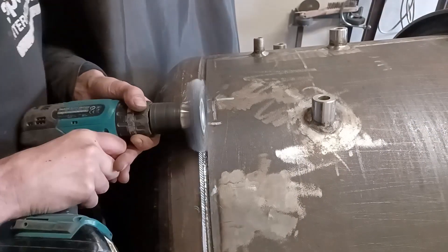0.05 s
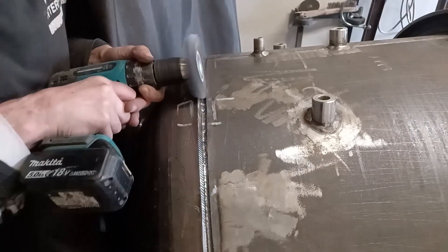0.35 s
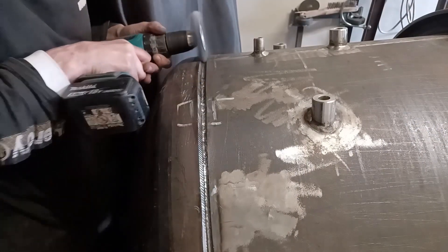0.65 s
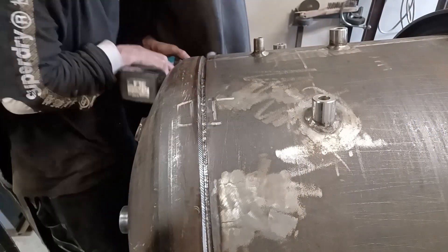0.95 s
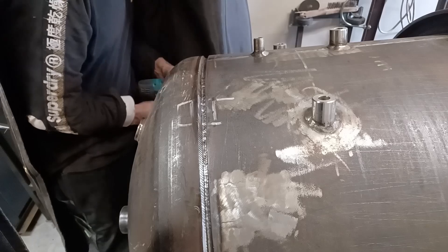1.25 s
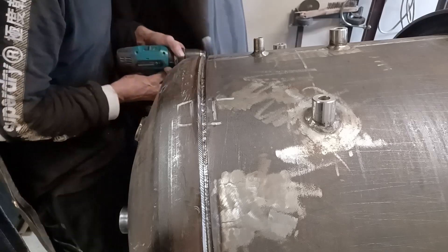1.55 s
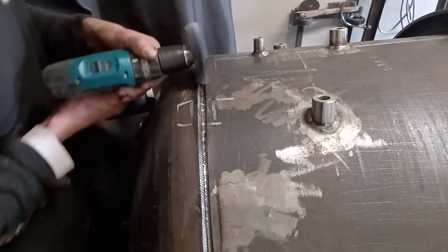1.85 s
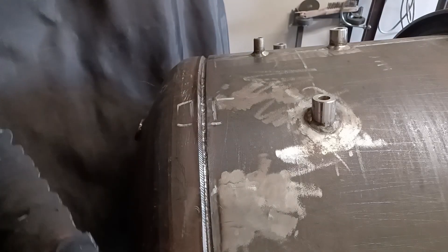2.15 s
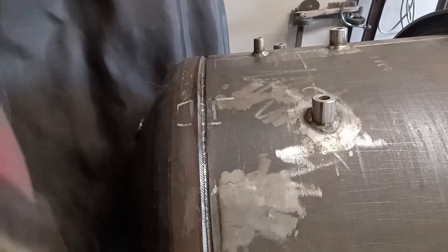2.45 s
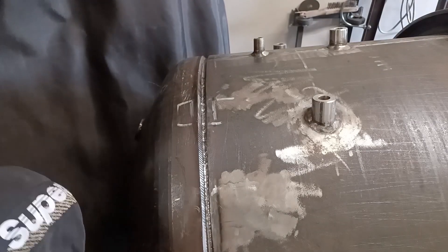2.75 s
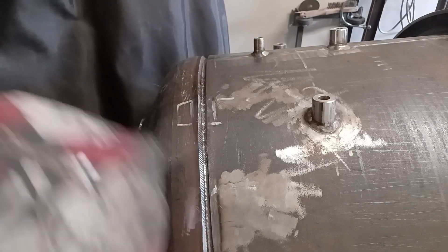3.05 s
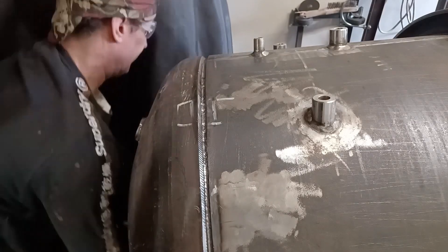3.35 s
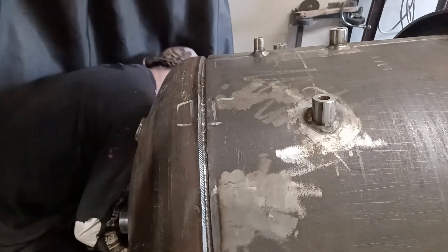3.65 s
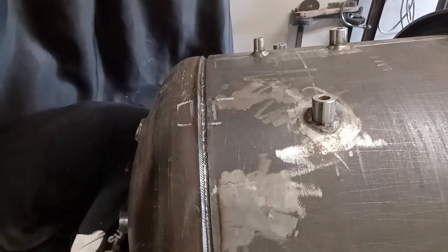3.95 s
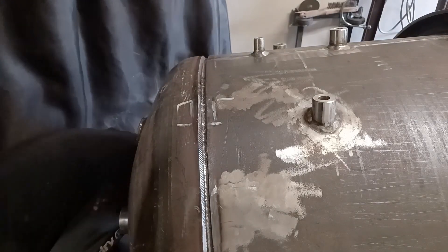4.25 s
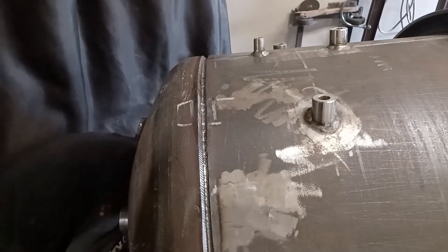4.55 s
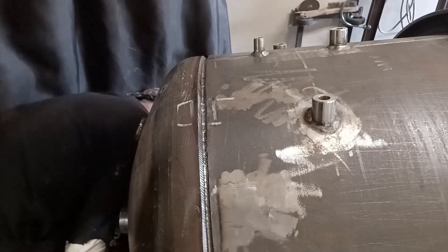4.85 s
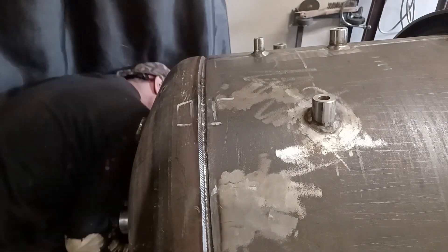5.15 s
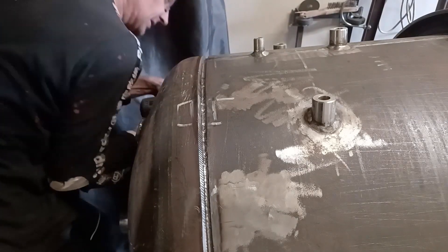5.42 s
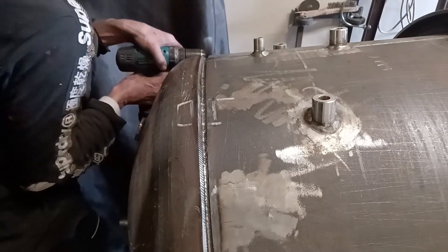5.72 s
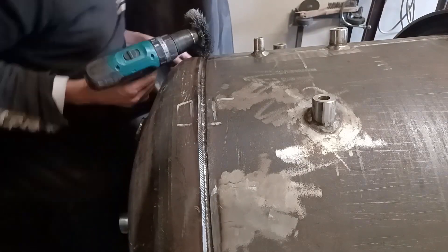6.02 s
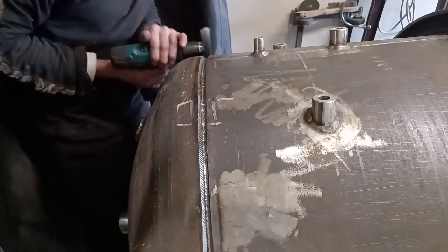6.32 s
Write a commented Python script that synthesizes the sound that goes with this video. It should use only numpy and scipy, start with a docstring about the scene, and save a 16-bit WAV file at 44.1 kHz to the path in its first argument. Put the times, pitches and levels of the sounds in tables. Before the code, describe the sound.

From the start, a cordless drill spins a wire wheel against a steel tank's weld, close by, making a harsh, high scratchy hiss. Its gears whine and squeal, rising and sagging in pitch with the pressure. Between 0.5 and 1.1 seconds, light bumps ring briefly on the tank. The brushing breaks for an instant at 1.1 seconds and returns softer, with a faint motor buzz. It swells to its brightest sizzle around 2 seconds, with another knock. From 2.5 to 5 seconds it is quieter and duller, with small surges and a few faint taps. The sizzle picks up around 5.3 seconds and the scratching grows near 5.9. At 6 seconds the wheel lifts briefly amid light knocks, then bites again until about 6.5 seconds. A faint, steady equipment whine, a fan tone and soft air noise lie underneath, in a workshop with little echo.

```python
"""In a workshop, a cordless drill runs a wire wheel along the weld seam of a steel tank.
Countless wire tips flick the steel, making a scratchy hiss, while the loaded gears sing and sag
in pitch with the pressure. Twice the wheel lifts off, and both sounds break off for a moment.
The tank is bumped now and then and rings briefly. Behind it all, some equipment whines at a
steady pitch, along with a fan's tone and soft air noise."""
import sys
import numpy as np
from scipy import signal
from scipy.fft import rfft, irfft
from scipy.io import wavfile
from scipy.ndimage import map_coordinates

SR = 44100
rng = np.random.default_rng(int(sys.argv[2]) if len(sys.argv) > 2 else 0)


def waveform_to_disk(signal):
    """Save audio, clipped to [-1, 1], as 16-bit WAV at the path in sys.argv[1]."""
    frames = np.transpose(np.atleast_2d(signal))
    scaled = np.clip(frames, -1, 1) * 32767
    samples = np.round(scaled).astype(np.int16)
    wavfile.write(sys.argv[1], SR, samples)


N = 285768
TIME, FREQS = np.arange(N) / SR, np.maximum(np.fft.rfftfreq(N, 1 / SR), 1)
CARRIER_RATIO = .194   # turns of the gearbox's planet carrier for one turn of the motor

# Levels in these tables are relative: the functions set the final loudness.
# The motor slows as the wheel is pressed on. Each row: time in seconds, turns per second.
MOTOR_SPEED = [(0.0, 361.2), (0.08, 389.8), (0.26, 359.1), (0.9, 359.6), (0.98, 411.9), (1.2, 428.4),
               (1.64, 413.6), (1.72, 365.0), (1.78, 390.2), (1.98, 372.3), (2.06, 394.4), (2.18, 385.9),
               (2.3, 423.7), (2.48, 388.1), (2.7, 382.5), (2.88, 391.8), (2.94, 375.1), (3.18, 376.2),
               (3.24, 398.7), (3.44, 395.5), (3.54, 440.8), (3.76, 448.6), (4.12, 418.6), (4.38, 438.0),
               (4.66, 359.8), (4.78, 389.3), (4.86, 377.8), (5.08, 390.6), (5.22, 359.4), (5.28, 381.4),
               (5.34, 346.9), (5.52, 349.3), (5.56, 362.4), (5.78, 382.9), (5.92, 318.2), (6.02, 391.3),
               (6.2, 439.3), (6.26, 430.1), (6.36, 370.0), (6.4, 379.8), (6.46, 447.8), (6.48, 446.7)]
# The tone colour of the wire flicks. Each row: frequency in Hz, level in dB.
WIRE_SPECTRUM = [(100, -35), (300, -31.5), (700, -23.5), (1150, -15), (1900, -11.5), (2600, -6.5),
                 (3500, 0.5), (4400, 1), (5000, -2), (6000, -2.5), (7800, -3.5), (10000, 2), (12400, 6),
                 (15500, 8.5)]
# Narrow rings of the seam and wires. Each row: frequency in Hz, width in Hz, boost in dB.
STEEL_RINGS = [(4500, 370, 1.5), (6060, 450, 1), (12140, 660, 2)]
# Where rasp, scratch, sizzle and top hiss lie. Each row: low edge in Hz, high edge in Hz.
BRUSH_BANDS = [(3600, 4900), (6000, 9500), (10500, 13500), (14000, 15600)]
# The low rasp of the wires. Each row: time in seconds, level in dB.
RASP_LEVEL = [(0.0, -34.5), (0.86, -30.5), (1.22, -40), (2.08, -31.5), (2.5, -39), (3.14, -40),
              (3.76, -41.3), (3.82, -39), (4.54, -42.5), (4.76, -39.5), (5.26, -40.5), (5.46, -37),
              (5.88, -40), (6.02, -34.5), (6.36, -37), (6.48, -45)]
# The scratch, loud when the wheel faces us, soft behind the tank. Each row: time in seconds, level in dB.
SCRATCH_LEVEL = [(0.0, -24.5), (0.92, -25.5), (1.2, -36.5), (1.48, -34), (1.76, -26.5), (2.24, -23),
                 (2.72, -38.5), (3.1, -46.5), (3.14, -37.5), (3.32, -38), (4.68, -39.5), (4.78, -38),
                 (5.1, -39.5), (5.22, -38), (5.46, -40), (5.84, -29.5), (6.18, -24), (6.48, -34.5)]
# The sizzle of the wire tips, swelling with each push. Each row: time in seconds, level in dB.
SIZZLE_LEVEL = [(0.0, -27), (0.06, -19.5), (0.88, -22), (1.08, -37.7), (1.84, -21.0), (1.96, -13),
                (2.14, -15.6), (2.5, -36), (2.78, -30.5), (3.08, -27.5), (3.24, -34.5), (3.46, -38),
                (3.54, -46), (3.98, -32.5), (4.02, -28.5), (4.38, -37), (4.6, -26), (5.0, -24), (5.06, -28),
                (5.28, -21.5), (5.64, -33), (5.96, -21), (6.26, -29.5), (6.3, -25), (6.34, -19),
                (6.48, -39)]
# The topmost hiss. Each row: time in seconds, level in dB.
HISS_LEVEL = [(0.0, -27), (0.88, -30.5), (1.06, -38), (1.34, -33), (1.52, -35.0), (1.9, -29.7), (1.94, -26),
              (2.24, -32), (2.28, -38), (2.82, -37), (2.96, -28), (3.08, -33), (3.22, -45.2), (3.38, -36.4),
              (3.54, -39.5), (4.48, -33.2), (4.58, -28.3), (5.14, -35.5), (5.36, -24.5), (5.82, -42),
              (5.92, -32), (6.48, -40)]

# The gears' three groups of tones. Each row: multiple of motor speed, level in dB, pitch spread in Hz.
GROWL_TONES = [(3, -18, 7.9), (3.9, -19.5, 60.5), (6, -7.5, 9.8), (7.35, -2, 160), (7.76, -1, 12.3),
               (7.65, -1, 120)]
WHINE_TONES = [(15, 1, 30), (15, -2, 200), (18, -1, 60.6), (12, -11, 140), (10.5, -15.5, 230)]
SQUEAL_TONES = [(31.7, 2, 80), (32.8, 0, 410)]
# How loud each group is; the squeal comes as the wheel bites. Each row: time in seconds, level in dB.
GROWL_LEVEL = [(0.0, -34), (0.82, -33.5), (1.08, -41.5), (1.28, -35), (1.74, -40), (2.56, -39.5),
               (2.82, -42), (2.96, -36), (3.28, -50), (3.48, -39), (3.58, -50.5), (3.68, -40),
               (4.48, -45.0), (4.6, -40), (5.86, -38.5), (6.18, -49), (6.38, -36.5), (6.48, -43)]
WHINE_LEVEL = [(0.0, -44), (0.04, -34), (0.98, -36), (1.04, -48), (1.68, -51), (2.2, -36), (2.7, -49.5),
               (2.94, -48.5), (3.98, -53.5), (4.28, -46), (5.22, -58), (5.38, -51), (5.64, -45),
               (6.48, -41.5)]
SQUEAL_LEVEL = [(0.0, -23.5), (0.7, -31.5), (1.08, -39), (1.38, -34.5), (1.72, -29.5), (2.14, -21.5),
                (2.5, -45.5), (3.08, -32), (3.18, -48), (3.44, -31.4), (3.54, -42), (4.24, -45),
                (5.22, -32), (5.56, -51), (5.88, -27), (6.18, -35), (6.32, -26.5), (6.48, -46)]
# The drill's housing swells tones near these pitches. Each row: frequency in Hz, width in Hz, boost in dB.
HOUSING_RINGS = [(1315, 68, 21), (2635, 840, 4.5), (4470, 520, 9.5), (6300, 510, 5)]
# The drill's body hums when it is near or braced on the tank.
# Each row: time in seconds, motor hum in dB, gearbox buzz in dB.
BODY_LEVELS = [(0, -57.5, -68), (.75, -56, -69), (1.15, -57, -56), (1.31, -65, -49), (1.52, -53.5, -52),
               (1.66, -70, -85), (5, -75, -77), (5.5, -65.5, -66), (6.48, -65, -73)]
# The tones in the gearbox buzz. Each row: multiple of the planet carrier's speed, level in dB.
BUZZ_TONES = [(2, -11), (3, -12.5), (4, -8.5), (5, -6), (6, -4.5), (7, -4.5), (8, -4.5), (9, -3.5),
              (10, -11)]

# The tones in the equipment's whine. Each row: frequency in Hz, level in dB.
EQUIPMENT_TONES = [(1655.8, 0), (3311.6, -21), (4967.4, -25)]
# Equipment and fan swell and fade as the worker moves about. Each row: time in seconds, level in dB.
EQUIPMENT_LEVEL = [(0.0, -51), (0.88, -54), (1.1, -46), (1.66, -47), (1.8, -59), (1.99, -49.5),
                   (3.05, -51.5), (3.54, -42.5), (3.93, -48.5), (5.07, -49), (5.41, -41), (5.85, -49.5),
                   (6.48, -49.5)]
FAN_LEVEL = [(0, -72), (1, -62), (2, -61), (2.5, -52), (3.3, -58.5), (3.7, -56), (4.9, -52), (5.5, -60.5),
             (6.2, -62), (6.48, -51)]
# The workshop's air noise. Each row: frequency in Hz, level in dB.
AIR_SPECTRUM = [(25, -22), (100, -11), (300, -10.5), (700, -5.5), (1200, 8.5), (1900, 7), (3300, 5.5),
                (5000, 1), (8000, -4), (15000, -10)]

# Bumps on the tank. Each row: start in seconds, level in dB.
BUMPS = [(0.528, -29.5), (0.79, -21.5), (0.815, -29), (0.928, -26.5), (0.956, -27.5), (0.984, -24),
         (1.001, -24), (1.025, -31), (1.07, -27.5), (1.129, -31.5), (2.2, -25), (3.393, -39), (3.523, -39),
         (3.554, -36), (5.024, -36.5), (6.058, -30.5), (6.078, -32), (6.115, -35), (6.153, -37),
         (6.169, -34.5)]
# The notes a bump rings with. Each row: frequency in Hz, level in dB, seconds to fade by 60 dB.
TANK_NOTES = [(264, -31, 0.13), (358, -17.5, 0.053), (470, -19, 0.067), (558, -13.5, 0.052),
              (738, -5, 0.049), (850, -12, 0.098), (969, -5, 0.089), (1044, -21, 0.21),
              (1097.5, 0.5, 0.087), (1158, -5, 0.071), (1280, -10.5, 0.1), (1500, -9.5, 0.033)]
# The wheel leaves the steel and lands again. Each row: lift time, landing time, fade-in, all in seconds.
LIFTS = [(1.081, 1.169, 0.0028), (6.008, 6.191, 0.017)]


def from_db(db):
    """Turn decibels into a number to multiply by."""
    return 10 ** (np.asarray(db) / 20)


def rms_one(x):
    """Scale a signal so that its average strength (rms) is 1."""
    return x / np.sqrt(np.mean(x ** 2) + 1e-20)


def in_time(rows, column=1):
    """Join a table's points with straight lines, giving one value for each sample."""
    table = np.transpose(rows)
    return np.interp(TIME, table[0], table[column])


def coloured(x, spectrum):
    """Give a signal a smooth tone colour and a strength of 1."""
    hz, db = np.transpose(spectrum)
    gain = from_db(np.interp(np.log(FREQS), np.log(hz), db))
    return rms_one(irfft(rfft(x) * gain, N))


def drift(rate_hz):
    """A smooth random wobble, about 1 in size, mostly slower than rate_hz."""
    points, step = 2 ** 15, 16   # one point for every 16 samples
    hz = np.fft.rfftfreq(points, step / SR)
    slow = irfft(rfft(rng.standard_normal(points)) / (1 + (hz / rate_hz) ** 2))
    return np.interp(np.arange(N) / step, np.arange(points), rms_one(slow))


def phase(hz):
    """Add up a changing frequency into the angle turned so far, in radians."""
    return 2 * np.pi * np.cumsum(hz) / SR


def boost_db(hz, rings):
    """How much a ringing object lifts a frequency: most when it is close to one of its own."""
    return sum(peak_db / (1 + (2 * (hz - centre) / width) ** 2) for centre, width, peak_db in rings)


def wire_flicks(motor_angle, per_second, size_db, tuft_db, flutter_db, turn_db):
    """Wire tips snap off the seam in tufts, a little harder once in each turn of the wheel."""
    sizes = from_db(size_db * np.minimum(rng.exponential(1, N), 4)) * rng.choice([-1, 1], N)
    flicks = sizes * (rng.random(N) < per_second / SR)
    wheel_turn = np.sin(motor_angle * CARRIER_RATIO / 3)
    return flicks * from_db(tuft_db * drift(350) + flutter_db * drift(20) + turn_db * wheel_turn)


def wire_brush(motor_angle):
    """The flicks make wires and steel ring; the tank and the worker shade each band of the sound."""
    flicks = wire_flicks(motor_angle, per_second=20000, size_db=1.5, tuft_db=.7, flutter_db=.47, turn_db=.15)
    spectrum = rfft(coloured(flicks, WIRE_SPECTRUM)) * from_db(boost_db(FREQS, STEEL_RINGS))
    levels_db = [in_time(RASP_LEVEL) - .4, in_time(SCRATCH_LEVEL) - 1.0,
                 in_time(SIZZLE_LEVEL) - 1.97, in_time(HISS_LEVEL) - .6]
    centres = np.log(BRUSH_BANDS).mean(axis=1)
    out = 0
    for (low, high), level_db, this_band in zip(BRUSH_BANDS, levels_db, np.eye(len(BRUSH_BANDS))):
        strength = irfft(spectrum * ((FREQS > low) & (FREQS < high)), N).std()
        share = np.interp(np.log(FREQS), centres, this_band)   # each band blends into its neighbours
        band = irfft(spectrum * share, N) / strength
        out += from_db(level_db + 0.72 * drift(5)) * band
    return out


def gear_tones(speed, motor_angle, tones, shake_db):
    """Teeth meet unevenly, so each tone wanders; the housing favours those near its own pitches."""
    out, power = 0, 0
    for multiple, db, spread_hz in tones:
        gain = from_db(db + boost_db(multiple * speed, HOUSING_RINGS))
        shake = from_db(shake_db * drift(spread_hz + 20))
        wander = phase(spread_hz * drift(2 * spread_hz))
        out += gain * rms_one(shake * np.sin(multiple * motor_angle + wander))
        power += gain ** 2
    return out / np.sqrt(power)   # the housing shifts the balance, not the overall loudness


def gears(speed, motor_angle):
    """The gears' pitch follows the motor; whine and squeal waver as the wheel grips and slips."""
    growl_gain = from_db(in_time(GROWL_LEVEL) - 0.06)
    growl = growl_gain * gear_tones(speed, motor_angle, GROWL_TONES, shake_db=2.0)
    whine_gain = from_db(in_time(WHINE_LEVEL) + 4.5 + 1.8 * drift(8.8))
    whine = whine_gain * gear_tones(speed, motor_angle, WHINE_TONES, shake_db=1.0)
    squeal_gain = from_db(in_time(SQUEAL_LEVEL) + 3.0 + 1.4 * drift(9.4))
    squeal = squeal_gain * gear_tones(speed, motor_angle, SQUEAL_TONES, shake_db=-1.6)
    return growl + whine + squeal


def tank_echo(x):
    """The tank wall throws the sound back; the delay wanders as the drill moves, shifting the colour."""
    delay_s = .0011 * np.exp(0.2976 * drift(1.185))
    echo = map_coordinates(x, [np.arange(N) - delay_s * SR], order=3)
    echo_gain = from_db(-14)
    return (x + echo_gain * echo) / np.hypot(1, echo_gain)


def room(x, fade_s, tail_db):
    """The curtained workshop adds a faint, dull tail, which drops by 60 dB in fade_s."""
    age = TIME[:SR // 2]
    tail = rng.standard_normal(len(age)) * from_db(-60 * age / fade_s) * (age > .004)
    tail = signal.sosfilt(signal.butter(1, 7000, fs=SR, output="sos"), tail)
    return x + from_db(tail_db) * signal.fftconvolve(x, tail / np.linalg.norm(tail))[:N]


def drill_body(motor_angle):
    """The spinning rotor hums, and the planet carrier, which holds the small gears, buzzes unsteadily."""
    hum = np.sin(2 * motor_angle) - from_db(3.5) * np.sin(3 * motor_angle)
    buzz = 0
    for multiple, db in BUZZ_TONES:
        wander = phase(7 * drift(24.8))
        buzz += from_db(db) * np.sin(multiple * CARRIER_RATIO * motor_angle + wander)
    hum_gain = from_db(in_time(BODY_LEVELS, column=1) + 1.2 * drift(13))
    buzz_gain = from_db(in_time(BODY_LEVELS, column=2) - 1.0 + 2.5 * drift(30))
    return hum_gain * hum + buzz_gain * rms_one(buzz)


def workshop(fan_hz):
    """The background: a pure electrical whine, a fan's wavering tone and soft air noise."""
    whine = rms_one(sum(from_db(db) * np.sin(2 * np.pi * hz * TIME) for hz, db in EQUIPMENT_TONES))
    fan = np.sin(phase(fan_hz + 1.4 * drift(2.5)))
    fan = rms_one(fan * from_db(2.6 * drift(2.0)))
    air = from_db(-47.5) * coloured(rng.standard_normal(N), AIR_SPECTRUM)
    return from_db(in_time(EQUIPMENT_LEVEL) + 1.3) * whine + from_db(in_time(FAN_LEVEL)) * fan + air


def tank_bumps(rattle_s, rattle_gain):
    """Each bump is a push with a short rattle after it, which sets the tank's notes ringing."""
    out, age = np.zeros(N), TIME[:SR // 10]
    for hz, note_db, fade_s in TANK_NOTES:
        force = np.zeros(N)
        for start_s, bump_db in BUMPS:
            blow = rattle_gain * rng.standard_normal(len(age)) * np.exp(-age / rattle_s)
            blow[0] += 0.61 * rng.choice([-1, 1])   # the push
            start = round(start_s * SR)
            force[start:start + len(blow)] += from_db(bump_db + note_db) * blow
        # This filter answers each push with a fading sine wave.
        decay, step = from_db(-60 / (fade_s * SR)), 2 * np.pi * hz / SR
        out += signal.lfilter([0, np.sin(step)], [1, -2 * decay * np.cos(step), decay ** 2], force + 1e-18)
    return signal.sosfilt(signal.butter(2, 180, "high", fs=SR, output="sos"), out)


def wheel_contact(slide_off_s, landing_db, settle_s):
    """1 while the wires touch, 0 once they slide off; they land slightly softer, then settle."""
    touch = np.ones(N)
    for lift_s, land_s, fade_in_s in LIFTS:
        leaving = np.exp(-np.maximum(TIME - lift_s, 0) / slide_off_s)
        landing = np.clip((TIME - land_s) / fade_in_s, 0, 1)
        settling = from_db(landing_db * np.exp(-np.maximum(TIME - land_s - fade_in_s, 0) / settle_s))
        touch *= np.maximum(leaving, landing * settling)
    return touch


def scene():
    """The motor drives wheel and gears, which sound only under load; both channels are the same."""
    speed = in_time(MOTOR_SPEED) * (1 + .003 * drift(14))   # the hand shakes the speed a little
    motor_angle = phase(speed)
    touch = wheel_contact(slide_off_s=0.0028, landing_db=-1, settle_s=0.01)
    brushing = touch * tank_echo(wire_brush(motor_angle) + gears(speed, motor_angle))
    brushing = room(brushing, fade_s=0.35, tail_db=-19.5)
    body = drill_body(motor_angle)
    bumps = from_db(-5.5) * tank_bumps(rattle_s=0.015, rattle_gain=0.056)
    mono = brushing + body + bumps + workshop(fan_hz=1297)
    return np.array([mono, mono])


def record(dry):
    """Round off the tallest peaks and steeply cut the treble above 15750 Hz."""
    rounded = 1.3 * np.tanh(dry / 1.3)
    return signal.sosfilt(signal.ellip(16, .1, 85, 15750, fs=SR, output="sos"), rounded)


dry = scene()
out = record(dry)
waveform_to_disk(out)
```